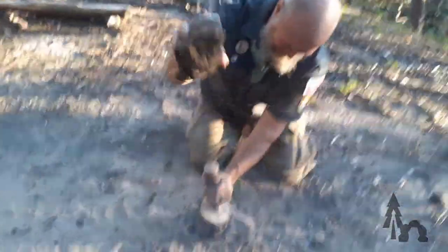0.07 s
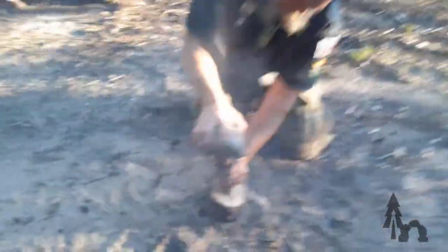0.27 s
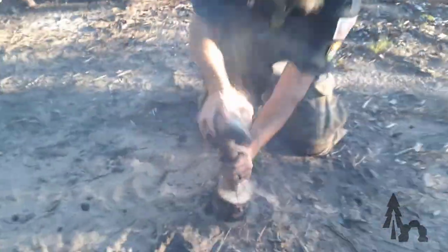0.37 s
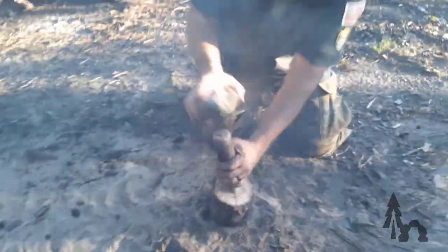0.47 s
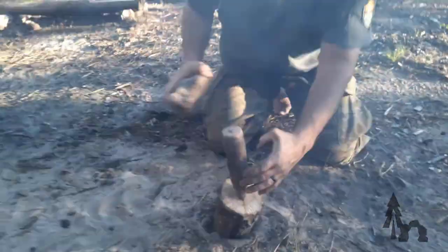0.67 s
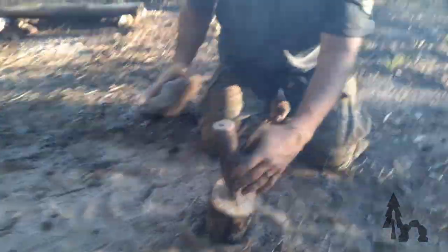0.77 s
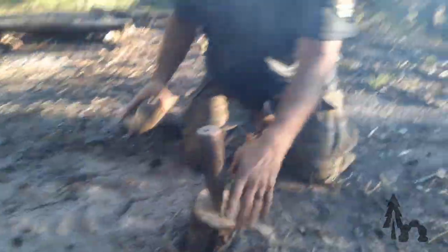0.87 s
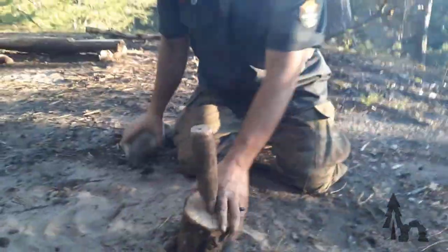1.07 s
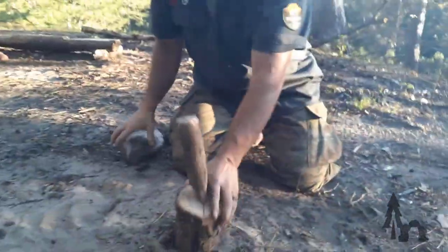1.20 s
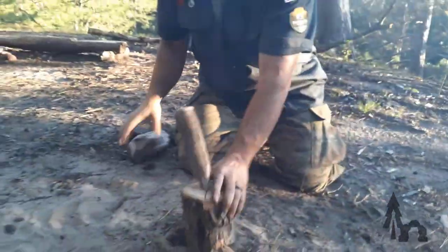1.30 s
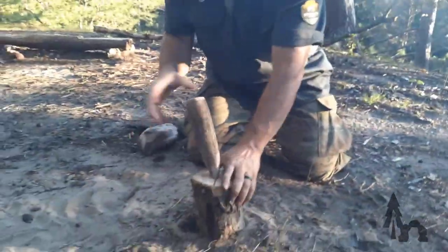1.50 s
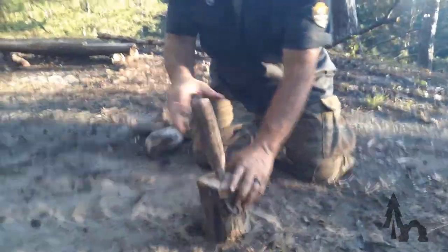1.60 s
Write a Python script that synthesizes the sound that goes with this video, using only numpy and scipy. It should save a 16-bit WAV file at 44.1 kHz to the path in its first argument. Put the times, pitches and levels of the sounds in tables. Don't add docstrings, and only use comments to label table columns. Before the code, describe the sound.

A rock strikes a wooden stake with one hard knock, echoing off trees, then wood creaks

```python
import sys
import numpy as np
from scipy import signal
from scipy.fft import rfft, irfft
from scipy.io import wavfile
from scipy.ndimage import uniform_filter1d

SR = 44100
rng = np.random.default_rng(int(sys.argv[2]) if len(sys.argv) > 2 else 0)


def level_to_linear(level):
    exponent = np.asarray(level, float) / 20
    return 10 ** exponent


def file_out(sig):
    cols = np.atleast_2d(sig).T
    lim = np.clip(cols, -1, 1)
    pcm = np.round(lim * 32767).astype(np.int16)
    wavfile.write(sys.argv[1], SR, pcm)


N = 72765
T = np.arange(N) / SR
BLOW_S = 0.2283


def colour(x, points):
    p = np.array(points)
    hz = np.maximum(np.arange(N // 2 + 1) * SR / N, 1)
    db = np.interp(np.log(hz), np.log(p[:, 0]), p[:, 1], left=-80, right=-80)
    y = irfft(rfft(x) * level_to_linear(db), N)
    return y / y.std()


def band(x, hz, width_hz):
    return signal.lfilter(*signal.iirpeak(hz, hz / width_hz, SR), x)


def pair(alike):
    mid, side = rng.standard_normal((2, N))
    c = np.clip(alike, 0, 1)
    opposed = side * np.array([[1], [-1]])
    return (np.sqrt(1 + c) * mid + np.sqrt(1 - c) * opposed) / np.sqrt(2)


def walk(rate_hz):
    hold = int(SR / rate_hz)
    steps = np.repeat(rng.standard_normal(N // hold + 1), hold)
    y = uniform_filter1d(uniform_filter1d(steps, hold), hold)[:N]
    return y / y.std()


def pan(db):
    return level_to_linear(np.array([db, -db]) / 2).reshape(2, -1)


def sides(left_db, right_db):
    return level_to_linear(np.array([[left_db], [right_db]]))


def ring(start_s, hz, t60_s, rise_s=0.00049):
    t = np.maximum(T - start_s, 0)
    return np.sin(2 * np.pi * hz * t) * level_to_linear(-60 * t / t60_s) * (1 - np.exp(-t / rise_s))


def grains(rate_hz, spread_db):
    clicks = rng.random(N) < rate_hz / SR
    size = level_to_linear(spread_db * np.minimum(rng.exponential(size=N), 10 / 3))
    g = clicks * size * np.sign(rng.standard_normal(N))
    return g / g.std()


def strokes(rows, column=2):
    power = 0
    for r in rows:
        swell = np.exp(-2 * (2 * (T - r[0]) / r[1]) ** 2)
        power = power + (level_to_linear(r[column]) * swell) ** 2
    return np.sqrt(power)


# hz, density_db
WOODS_COLOUR = [(18, -44), (30, -19.5), (86, -7.5), (875, -14), (947, -11), (2030, -6.5), (5990, -21.5),
                (14300, -18.5), (16300, -42)]


def woods():
    return colour(pair(0.15), WOODS_COLOUR) * level_to_linear(-65 + 1.6 * walk(30))


def insect():
    hz, width_hz, from_s, to_s, fade_s = 3450, 79, 0.914, 2.3, 0.039
    note = band(band(rng.standard_normal(N), hz, width_hz), hz, width_hz)
    on = np.clip(np.minimum(T - from_s, (to_s - T) / 12) / fade_s, 0, 1)
    level_db = -68 - 17 * (T - from_s) + 1.5 * walk(43.7)
    return pan(1.9) * on * note / note.std() * level_to_linear(level_db)


# start_s, length_s, level_db, left_minus_right_db
AIR_PUFFS = [(0.011, 0.24, -57, -3), (0.17, .016, -37.5, 21), (0.295, 0.15, -40, 3),
             (0.344, 0.11, -44.5, 0.5), (0.4, 0.054, -54, -1), (0.433, 0.15, -46, 2.5),
             (0.527, 0.16, -54, 5.5), (0.613, 0.081, -48.5, -2), (0.708, 0.16, -66.5, -9.5),
             (.9, 0.49, -76, -1), (1.252, 0.26, -61, 3), (1.421, 0.069, -49.5, 5), (1.489, 0.058, -48, 15),
             (1.567, 0.091, -51, 9.5), (1.636, 0.1, -41.5, 9)]
# hz, density_db
AIR_COLOUR = [(15, -52), (25, -19), (70, 9), (156, -4.5), (199, -8), (306, -25), (400, -24), (520, -42),
              (880, -120)]


def air():
    gust = level_to_linear(1.5 * np.array([walk(7.5), walk(8.2)]))
    puffs = sum(strokes([row]) * pan(row[3]) for row in AIR_PUFFS)
    return colour(pair(0.94), AIR_COLOUR) * gust * puffs


# late_s, pitch_hz, level_db, t60_s
POP_MODES = [
    (.00003, 2825, -1.5, .0021),
    (.00011, 7200, -9, .001),
    (.00013, 1057, 8.5, .0018),
    (.00058, 1572, -11, .004),
]


def pop():
    start_s, rise_s = 0.1657, 0.0001
    left = -sum(level_to_linear(db) * ring(start_s + late, hz, t60, rise_s) for late, hz, db, t60 in POP_MODES)
    left = left + level_to_linear(-9) * ring(start_s - 0.00024, 206, 0.019, rise_s)
    right = level_to_linear(-18) * ring(start_s + 0.00065, 1570, 0.0017)
    return np.array([left, right])


# start_s, peak_db, left_minus_right_db, pitch_hz
GRIT = [(.008, -42.5, -4, 9400), (0.2647, -32, 10, 6100), (0.3744, -56, 0, 9000),
        (0.4144, -52.5, -4.5, 11160), (0.4268, -48, 5, 11100), (0.4435, -52, -2.5, 11030),
        (0.4507, -38.5, 3.5, 11200), (0.503, -55.5, -2, 9000), (0.5511, -43, -2.5, 12600),
        (0.5943, -49, 0.5, 10970), (0.629, -46, 2, 12300), (0.853, -59.5, 4.5, 10010),
        (0.9307, -56, 8, 12500), (0.951, -56, 7, 12600), (1.039, -53.5, -5, 9400),
        (1.054, -50.5, -12, 9600), (1.058, -40.5, -2, 10600), (1.1574, -39.5, 6, 4600),
        (1.2933, -40.5, 0.5, 6400)]


def grit():
    noise, out = pair(0.13), 0
    for start, db, pan_db, hz in GRIT:
        decay_db = -60 * np.maximum(T - start, 0) / 0.006
        tick = noise * (T > start) * level_to_linear(db + 6 + decay_db)
        width_hz = 0.57 * hz
        out = out + pan(pan_db) * band(band(tick, hz, width_hz), hz, width_hz)
    return out


# start_s, length_s, level_db, crackle_db
SLEEVE = [
    (0, 0.11, -52.5, -58.5),
    (0.073, 0.2, -55, -63),
    (0.124, 0.048, -50.5, -52.5),
    (0.156, 0.049, -45, -53),
    (0.186, 0.16, -55, -63),
    (0.3, 0.065, -70, -58.5),
    (0.501, 0.49, -63, -66),
]
# hz, density_db
RUB_COLOUR = [(3240, -29.5), (5500, -9), (6270, -19.5), (6930, -15.5), (7910, -14.5), (8630, -2),
              (12600, -5), (15500, -10.5), (16300, -25)]
# hz, density_db
SWISH_COLOUR = [(180, -43), (300, -13), (925, -6.5), (1000, -4.5), (2030, -2.5), (4080, -14.5),
                (8000, -19.5), (10400, -46), (17600, -120)]


def rub():
    contacts = grains(9000, 1.5) * 0.5 + pair(0.33)
    crackle = colour(contacts, RUB_COLOUR) * level_to_linear(1.3 * walk(120))
    swish = colour(pair(0.21), SWISH_COLOUR) * strokes(SLEEVE)
    return crackle * pan(1.5) * strokes(TWIST + SLEEVE, column=3) + swish


# start_s, level_db, pitch_hz, t60_s
BUMPS = [(1.1686, -25.5, 115, 0.026), (1.1742, -33, 270, 0.0263), (1.1775, -26, 110, .05),
         (1.195, -33, 73.5, 0.086), (1.204, -39.5, 190, 0.034), (1.347, -26, 480, 0.025),
         (1.352, -24, 96.6, 0.049), (1.5732, -17.5, 482, 0.017), (1.5741, -29, 335, 0.019),
         (1.6, -24, 530, 0.023), (1.6115, -26.5, 86.3, .1)]


def bumps():
    gritty = level_to_linear(1) * band(band(rng.standard_normal(N), 690, 1700), 500, 2200)
    out = 0
    for start, db, hz, t60 in BUMPS:
        bump = ring(start, hz, t60, 0.45 / hz)
        if hz > 200:
            decay_db = -60 * np.maximum(T - start, 0) / (0.15 * t60)
            bump = bump + gritty * (T > start) * level_to_linear(decay_db)
        out = out + level_to_linear(db) * bump
    return out


# start_s, level_db, pitch_hz, left_minus_right_db
KNOCKS = [(0.2668, -23, 594.6, 0), (0.2677, -25, 334, 0), (0.569, -45, 1310, -0.5),
          (1.159, -43.5, 700, 4.5), (1.1748, -31.5, 1000, -8), (1.1772, -33, 613, -5),
          (1.177, -34.5, 1480, -17.5), (1.291, -53, 1110, -17), (1.331, -33, 1650, -13.5),
          (1.342, -30, 590, -1.5), (1.3423, -33, 1700, -10), (1.467, -31, 1660, -15),
          (1.4764, -28.5, 1700, 2), (1.4754, -39, 1080, -4), (1.477, -31, 490, 0), (1.488, -39.5, 1030, 0),
          (1.494, -34.5, 496, -1.5), (1.496, -33, 1700, -9), (1.552, -34.5, 1850, -12),
          (1.5728, -24, 1040, -2), (1.598, -28, 1050, 0), (1.6075, -33, 1460, 8), (1.608, -29, 503, 2.5),
          (1.609, -28, 1090, -4), (1.621, -31, 490, 0), (1.623, -31, 1740, -13), (1.633, -31, 480, 0),
          (1.6402, -34, 1920, 27), (1.643, -32, 2010, 25)]


def knocks():
    cycles, rise_cycles = 11.1, 0.62
    return sum(level_to_linear(db) * pan(pan_db) * ring(start, hz, cycles / hz, rise_cycles / hz)
               for start, db, hz, pan_db in KNOCKS)


# start_s, length_s, level_db, crackle_db
TWIST = [(1.14, 0.083, -89, -61.5), (1.179, 0.026, -51, -47.5), (1.25, 0.38, -64.5, -64),
         (1.47, 0.26, -57, -57.5), (1.325, 0.045, -73, -54), (1.343, 0.062, -47.5, -44),
         (1.375, 0.11, -56.5, -50.5), (1.415, 0.015, -53, -39), (1.465, 0.016, -56, -52.5),
         (1.487, 0.064, -44, -40), (1.53, 0.33, -52, -47), (1.562, 0.029, -54, -36),
         (1.575, 0.039, -48, -46.5), (1.612, 0.058, -40.5, -39.5), (1.624, 0.034, -42.5, -47),
         (1.645, 0.035, -42, -41)]
# pitch_hz, width_hz, level_db
SOCKET = [(490, 142, 1), (1039, 99, -3.5), (1700, 71, -2.5), (2660, 61, -5.5), (3294, 250, -1),
          (4418, 130, -5), (5030, 66, -16.5), (6710, 150, -9)]


def twist():
    slips = grains(1400, 3.5) + 0.85 * pair(0.17)
    slips = slips * strokes(TWIST) * level_to_linear(1.3 * walk(150))
    body = 0
    for hz, width_hz, db in SOCKET:
        wide_hz = 2.4 * width_hz
        mode = band(band(slips, hz, wide_hz), hz, 3 * wide_hz)
        equalise = np.sqrt(2000 / width_hz)
        body = body + level_to_linear(db + 3 * walk(45)) * mode * equalise
    return 0.95 * body + level_to_linear(-4) * band(slips, 1580, 3300)


# hz, density_db
TREES_COLOUR = [(150, -31), (250, -10.5), (723, -10), (1730, -2), (2670, -14.5), (4410, -17), (5250, -26.5),
                (9660, -26.5), (16000, -32.5)]
# hz, early_t60_s, late_t60_s
TREES_T60 = [(300, 0.37, 0.73), (1295, 0.4, 0.48), (2004, 0.46, 1.12), (2780, 0.41, 1.2),
             (10010, 0.54, 1.1)]


def trees():
    start_s, rise_s, late_db = 0.026, 0.0014, -12
    blows = ((BLOW_S, 0), (-0.45, 1))
    echoes, rows, out = colour(pair(0.11), TREES_COLOUR), np.array(TREES_T60), 0
    edges_hz = 223 * 2 ** (np.arange(0, 19.5) / 3)
    for lo, hi in zip(edges_hz[:-1], edges_hz[1:]):
        centre = np.log(lo * hi) / 2
        early_s = np.interp(centre, np.log(rows[:, 0]), rows[:, 1])
        late_s = np.interp(centre, np.log(rows[:, 0]), rows[:, 2])
        envelope = 0
        for blow_s, db in blows:
            t = np.maximum(T - blow_s - start_s, 0)
            decay = level_to_linear(-60 * t / early_s) + level_to_linear(late_db - 60 * t / late_s)
            envelope = envelope + level_to_linear(db) * (1 - np.exp(-t / rise_s)) * decay
        flicker = level_to_linear(2 * np.array([walk(90), walk(90)]))
        third = signal.butter(2, [lo, hi], "band", fs=SR, output="sos")
        out = out + envelope * flicker * signal.sosfilt(third, echoes)
    return level_to_linear(-25.5) * out


# pitch_hz, left_db, right_db, t60_s, late_s
GROUND = [
    (60, -12, -21, 0.11, 0.0074),
    (175, -17, -17, 0.082, .0105),
    (230.4, -27.5, -26.5, 0.13, 0.027),
    (442, -26, -23, 0.09, 0.024),
    (664, -26.5, -26, 0.033, 0.027),
]


def ground():
    lag_s = 0.001 * np.array([[0], [1]])
    return -sum(sides(left, right) * ring(BLOW_S + late + lag_s, hz, t60, 0.0015)
                for hz, left, right, t60, late in GROUND)


def crack():
    hz, width_hz = 8300, 3500
    noise = band(band(pair(0.56), hz, width_hz), hz, 2 * width_hz)
    return noise * strokes([(BLOW_S + 0.0018, 0.004016, -10)])


# late_s, pitch_hz, left_db, right_db, t60_s
REBOUNDS = [
    (.00315, 2173, -3, 0, .006),
    (.00334, 1665, 7.5, 2, .007),
    (.0034, 3500, -20, -18, .008),
    (.00626, 1615, -7.5, .7, .008),
    (.0064, 4420, -26, -27, .012),
    (.00843, 1450, -21, -14, .023),
    (.0115, 1500, -14, -30, .012),
]


def rebounds():
    return sum(sides(left, right) * ring(BLOW_S + late, hz, t60, 0.001)
               for late, hz, left, right, t60 in REBOUNDS)


# pitch_hz, left_db, right_db, t60_s
STAKE = [(480, -23, -33, 0.049), (754.4, -22.5, -23.5, 0.028), (998, -26.5, -27.5, .02),
         (1508, -4, 4.5, 0.014), (1650, 0.5, -6, 0.011), (1966, -16, -2.5, 0.016),
         (2250, -14.5, -12, 0.0079), (3000, -26.5, -13, 0.0071), (4030, -26, -28.5, .01),
         (4670, -29.5, -22, 0.0065), (8500, -34, -32.5, 0.0038)]


def stake():
    contact_s, hold_s, press_db = 0.0012, 0.0037, 16
    lift = np.clip((BLOW_S + 0.00315 - T) / 0.00045, 0, 1)
    out = 0
    for hz, left, right, t60 in STAKE:
        choke = lift if hz > 1200 else 1
        out = out + sides(left, right) * ring(BLOW_S, hz, t60, contact_s) * choke
    return out * level_to_linear(press_db * np.clip((BLOW_S + hold_s - T) / contact_s, 0, 1))


def scene():
    background = woods() + insect() + air() + pop()
    handling = grit() + rub() + bumps() + knocks() + twist()
    blow = trees() + ground() + crack() + rebounds() + stake()
    return background + handling + blow


def top_cut(x):
    return signal.sosfilt(signal.butter(12, 16450, fs=SR, output="sos"), x)


def record(dry):
    cut = signal.sosfilt(signal.butter(2, 41, "high", fs=SR, output="sos"), dry)
    soft = cut / np.sqrt(1 + cut ** 2)
    soft = signal.sosfilt(signal.ellip(8, 0.2, 60, 15750, fs=SR, output="sos"), soft)
    return top_cut(np.clip(soft, -1, 1))


dry = scene()
out = record(dry)
file_out(out)
```